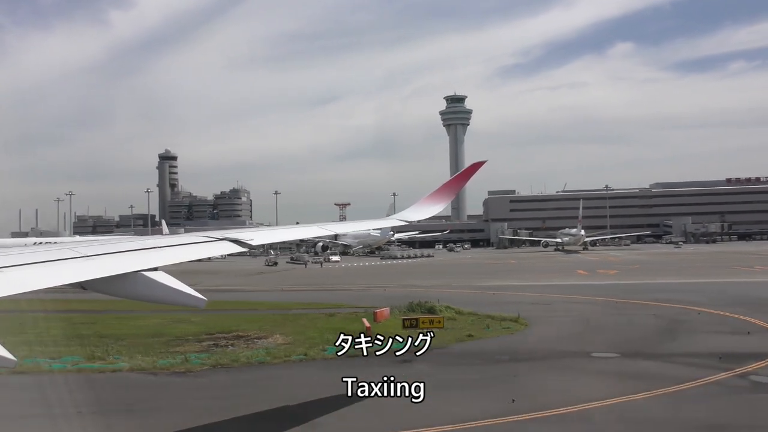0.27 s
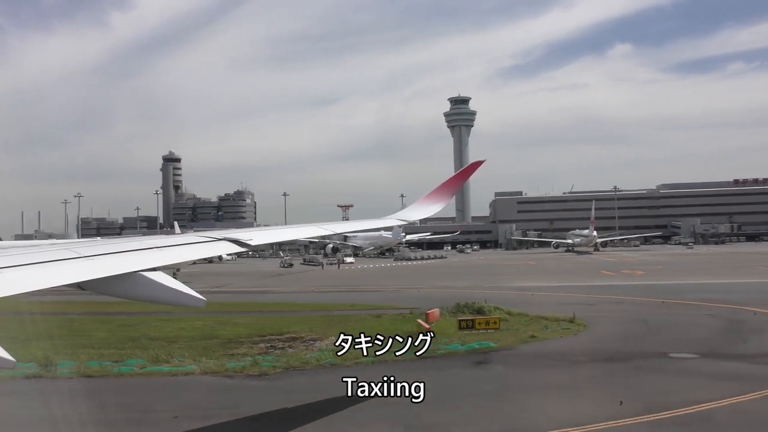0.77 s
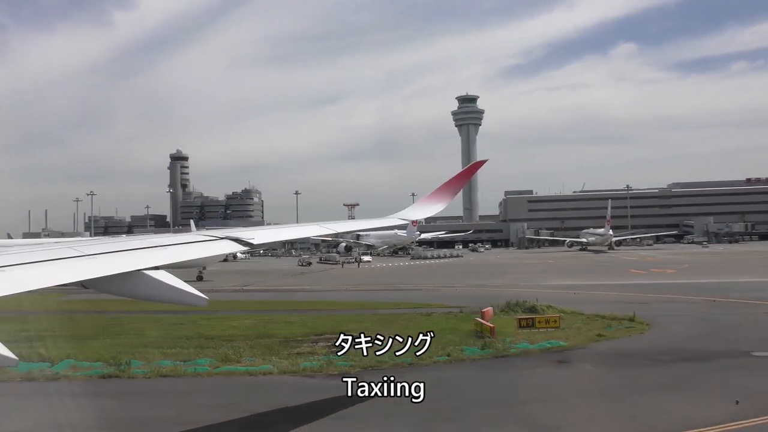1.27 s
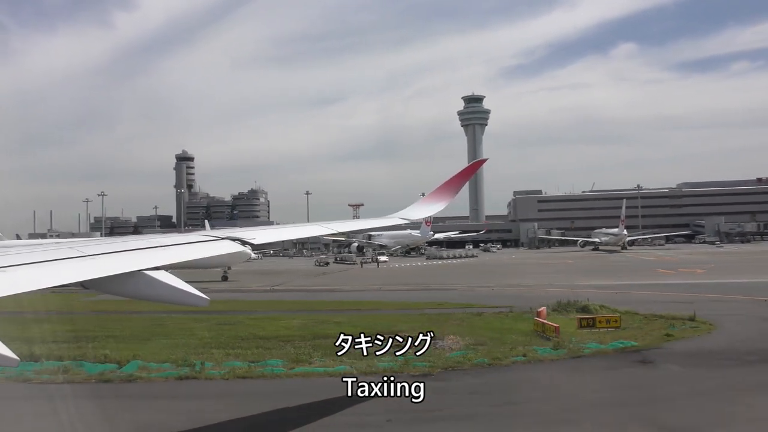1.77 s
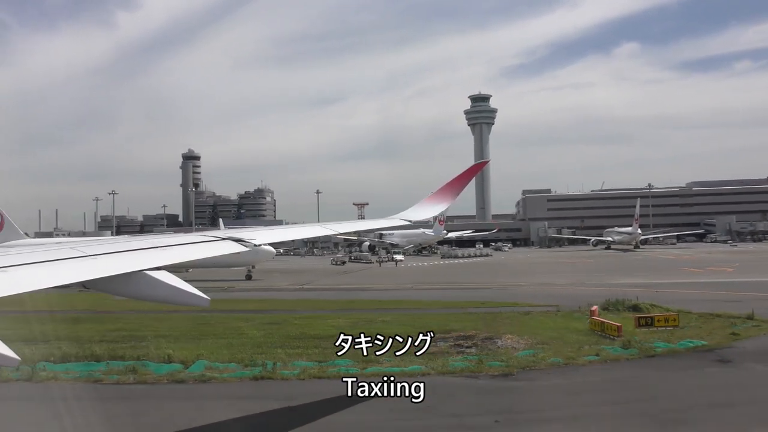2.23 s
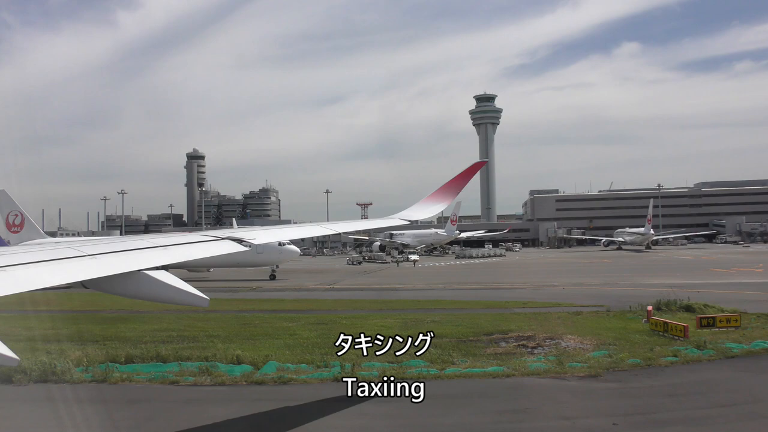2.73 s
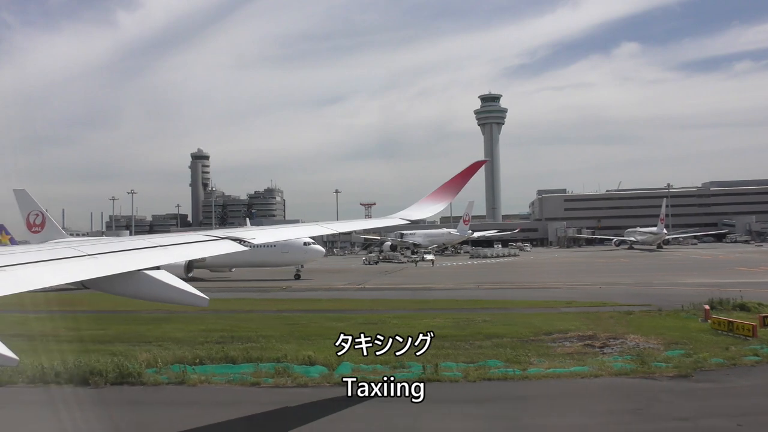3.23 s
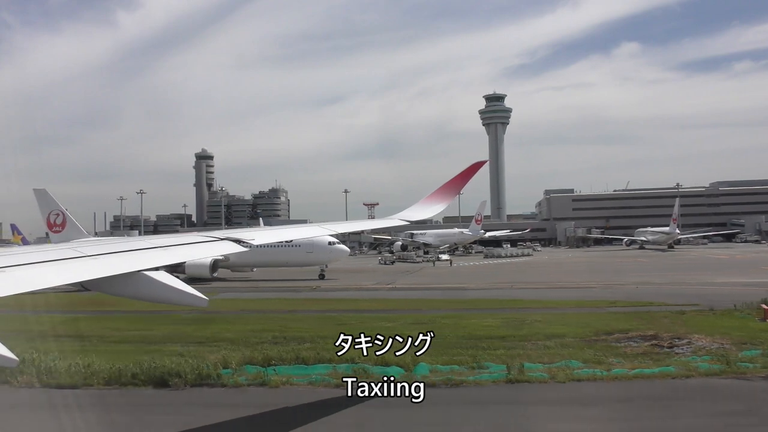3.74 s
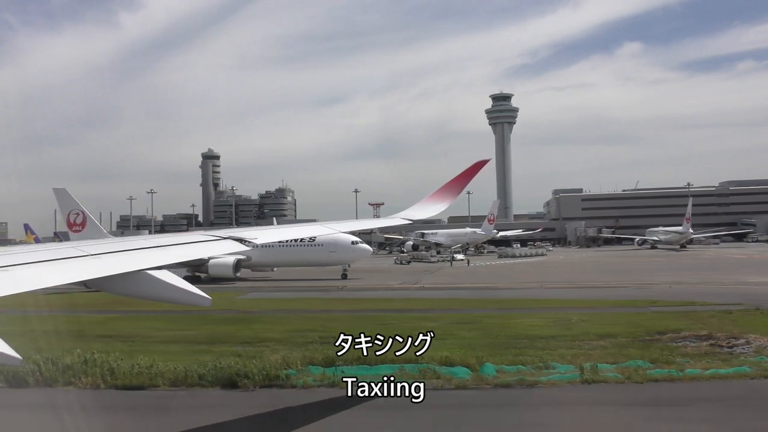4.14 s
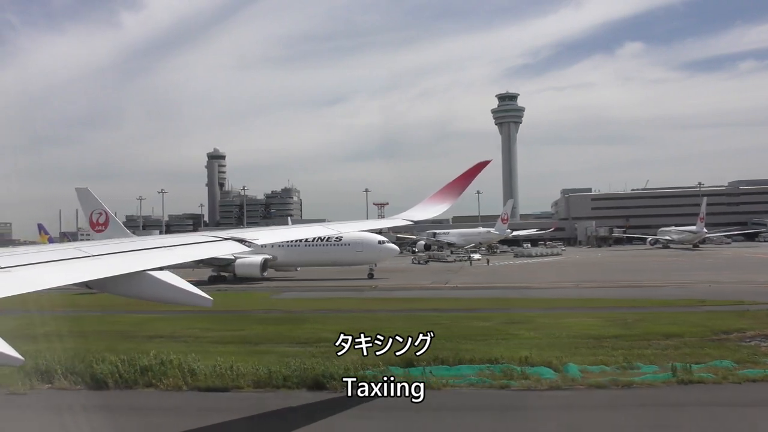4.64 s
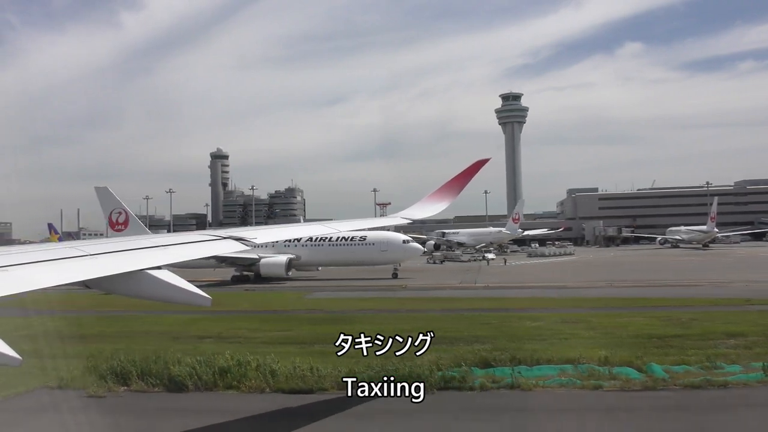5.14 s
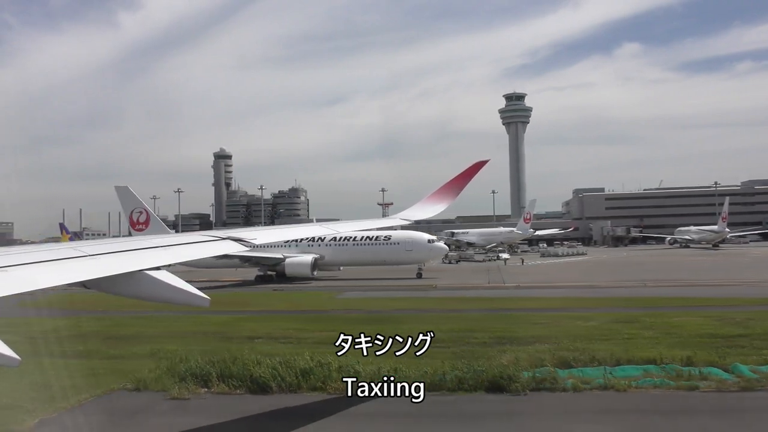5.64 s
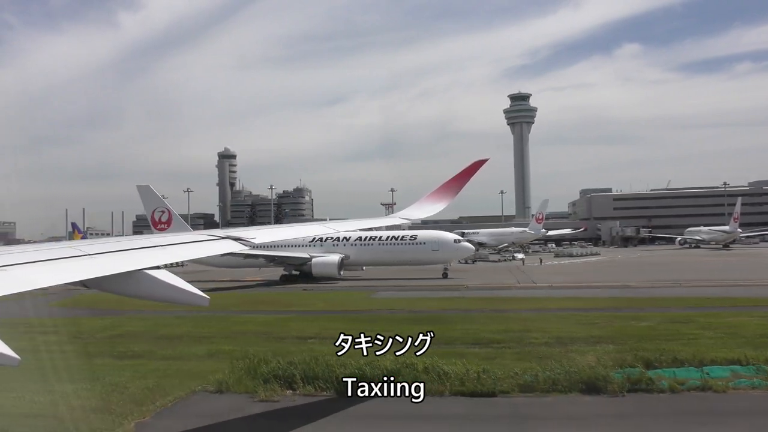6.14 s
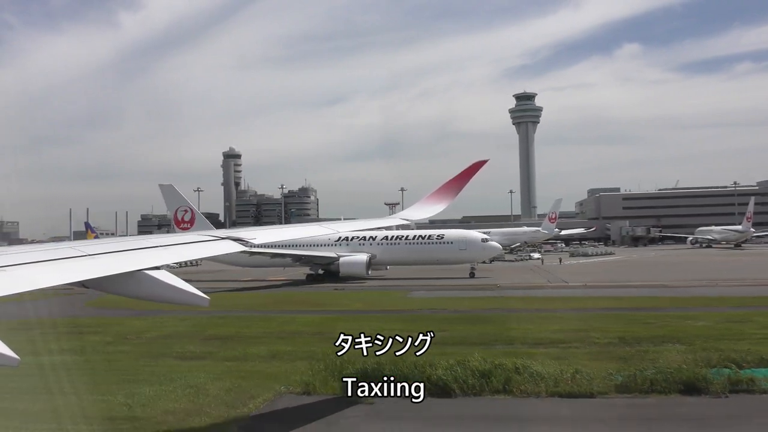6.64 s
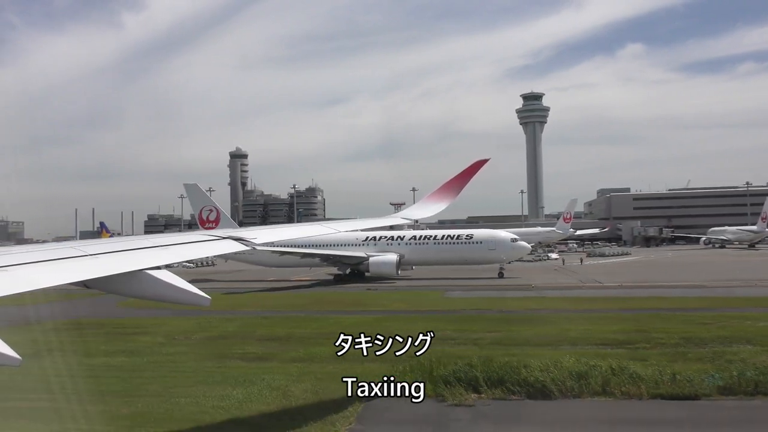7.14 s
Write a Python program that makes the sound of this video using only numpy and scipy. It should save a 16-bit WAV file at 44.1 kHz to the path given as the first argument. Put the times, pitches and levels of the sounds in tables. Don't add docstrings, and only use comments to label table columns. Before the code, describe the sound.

Inside a taxiing jet cabin, deep boomy wheel and engine rumble swells under steady vent hiss, faint pump hum, panel knocks and tiny trim ticks.

```python
import sys
import numpy as np
from scipy import signal
from scipy.fft import rfft, irfft
from scipy.io import wavfile
from scipy.ndimage import uniform_filter1d, minimum_filter1d

SR = 44100
rng = np.random.default_rng(int(sys.argv[2]) if len(sys.argv) > 2 else 0)


def waveform_to_disk(signal):
    frames = np.transpose(np.atleast_2d(signal))
    scaled = np.clip(frames, -1, 1) * 32767
    samples = np.round(scaled).astype(np.int16)
    wavfile.write(sys.argv[1], SR, samples)


def volts_from_db(level):
    exponent = np.asarray(level, float) / 20
    return 10 ** exponent


N = 326340

# pitch_hz, density_db
MIC_HISS = [(2650, -34), (4500, 3), (7020, -3), (11700, -21), (14000, -24), (15500, -34)]
# pitch_hz, left_minus_right_db, left_lead_rad, likeness_0_to_1
PORTS = [(20, 12.5, -1.8, 0.9), (80, 3, -0.62, 1), (178, 1.5, -0.9, 0.98), (235, 0, -1.03, 0.99),
         (310, -2, -1.04, 1), (398, -19, -0.98, 0.8), (447, -4, -0.89, 0), (550, 0, 0.5, 0),
         (616, -5.5, 0.047, 0.57), (900, -4.5, 0.47, 0.33), (1390, -1.5, 0.57, 0.73), (1890, -1, 1, 0.7),
         (3000, 0.1, 0.22, 0.6), (4500, .7, 0.14, 0.58), (6950, 0.5, 0.54, 0.98), (10100, 0.5, -0.22, 0.64),
         (15000, 0.5, 0.21, 0.5)]
# centre_s, share_taken_db, half_s
GAIN_DIPS = [
    (1.236, -4, 0.0043),
    (1.26, -5.5, 0.0059),
]

# pitch_hz, density_db
VENT = [(350, -1.5), (500, 0.5), (700, 1.5), (1050, -7), (1700, -11), (2400, -13), (3400, -17.5),
        (4200, -24.5), (6000, -63.5), (9000, -63.5)]
# pitch_hz, width_hz, level_db
DUCT = [(608.6, 40, 8.5), (890, 40, 3), (1360, 490, 5), (1439, 40, 5.5), (2620, 84, 4.5), (3210, 45, 7)]
# pitch_hz, density_db
NOZZLE = [(2650, -28.5), (4500, -2), (7020, -10), (11600, -7.5), (14300, -10), (15700, -11.5)]

# pitch_hz, density_db
RUSTLE = [(1000, -11.5), (2000, 3.5), (4000, 9.5), (6300, -3.5), (8000, 2), (11500, -6), (13500, -19.5),
          (16000, -30)]
# centre_s, share_taken_db, half_s
LULLS = [(.25, -13, 0.049), (.51, -22.5, 0.029), (1.24, -9.5, .03), (1.33, -13.5, 0.019),
         (1.62, -11.5, 0.027), (2.3, -13, 0.038), (2.68, -12, 0.027), (3.09, -11, 0.018), (3.33, -7, 0.013),
         (3.48, -13, 0.028), (3.72, -23.5, 0.032), (4.1, -11.5, 0.04), (5.32, -18.5, 0.058),
         (5.62, -16, 0.038), (6.7, -19, .06), (6.86, -10, .02)]
# pitch_hz, density_db
CRACKLE = [(1000, -18.5), (2000, 8), (4000, -0.5), (6000, -6), (8500, -6), (11500, -9.5), (14000, -19),
           (16000, -25.5)]
# centre_s, level_db, half_s
SPELLS = [(.01, -59, 0.022), (.55, -63, 0.033), (3.55, -59, 0.022), (1.45, -64, 0.11), (2.2, -57, 0.037),
          (2.47, -56.5, 0.084), (2.7, -60, 0.016), (3.19, -55, 0.055), (3.38, -58.5, 0.037),
          (3.905, -54.5, .022), (4.52, -59.5, 0.055), (4.68, -60.5, 0.056), (4.82, -59, 0.052),
          (3.27, -58.5, .03), (5.09, -58, 0.03), (5.25, -61, 0.052), (5.48, -56.5, 0.033),
          (6.1, -64, 0.026), (6.22, -59, 0.072), (6.48, -55, 0.044), (6.82, -61, 0.028), (6.65, -63, 0.1),
          (7.03, -58, .03), (7.39, -71, .015)]
# pitch_hz, width_hz
SQUEAK = (11650, 800)
# centre_s, level_db, half_s
SQUEAKS = [
    (.53, -77, .03),
    (2.17, -72, 0.068),
    (2.42, -72, .07),
    (4.45, -79, .06),
    (5.27, -77, .07),
    (5.5, -75, .04),
    (6.93, -76, .03),
]

# pitch_hz, density_db
CLOTH = [(500, -8), (1450, 0), (1900, -6.5), (2400, -2), (3300, -6.5), (5000, -11), (8000, -16.5),
         (15500, -26)]
# pitch_hz, width_hz, level_db
HOLLOWS = [(1450, 120, 3), (2260, 270, 5), (7850, 1200, 4)]
# centre_s, level_db, half_s
STROKES = [
    (0.382, -42.5, 0.03),
    (0.985, -42.5, 0.032),
    (0.47, -55, 0.037),
    (0.99, -50.5, 0.036),
    (.34, -56.5, 0.017),
]

# start_s, pitch_hz, peak_db, t60_s
RINGS = [(.545, 10500, -63, .08), (.688, 6800, -62, .08), (1.131, 11100, -56, .06), (1.134, 7000, -58, .14),
         (1.385, 11600, -62, .1), (1.415, 8000, -60, .08), (2.919, 11100, -60, .08),
         (3.13, 5760, -52, 0.093), (3.134, 11500, -62, .08), (3.169, 11600, -56, .08),
         (3.169, 7900, -51, .07), (3.17, 5560, -53, .06), (3.2, 11800, -56, .12), (3.204, 5700, -54, .09),
         (3.206, 8200, -63, .07), (3.345, 10500, -60, .06), (5.21, 7700, -57, 0.13),
         (5.71, 14850, -64, .08), (6.019, 8300, -63, 0.079), (6.1, 9900, -56, .08), (6.23, 9990, -60, .08),
         (6.51, 9300, -55, 0.11), (6.93, 11760, -60, .12), (7.02, 8000, -60, .1), (7.223, 7400, -58, .07)]
# start_s, peak_db, low_band_db, top_band_db
TICKS = [(0.6858, -51.5, -4, -15.5), (0.7906, -49, -8, -20.5), (1.1296, -36, -24, -14.5),
         (1.2094, -56, -1, -11.5), (1.273, -51.5, -8, -15), (1.3783, -47, -14, -10),
         (1.4132, -48, -10, -15.5), (1.9294, -46.5, -8, -16.5), (2.0951, -49, -2, -19),
         (2.4014, -48.5, -7, -11), (2.4375, -53, -9, -10), (2.8285, -50, -1, -8.5),
         (2.9188, -41.5, -17, -14), (2.9831, -47.5, -3, -16), (3.124, -47.5, -5, -20),
         (3.129, -39, -2, -24), (3.1692, -44, -8, -12.5), (3.18, -57, -6, -14.5), (3.2036, -54, -13, -11),
         (3.2734, -49, -7, -11), (3.5389, -47.5, -1, -10.5), (4.4388, -48, -3, -20),
         (4.853, -46.5, -6, -22), (5.011, -44.5, -11, -19), (5.0853, -51, -11, -16),
         (5.7029, -44, -9, -22.5), (5.875, -52, -13, -4), (6.0132, -46, -7, -20.5), (6.23, -42.5, -4, -13),
         (6.512, -47, 2.5, -18), (6.8728, -51, -11, -12.5), (6.9112, -48, -9, -15.5),
         (7.223, -47, -19, -19)]
# pitch_hz, width_hz
SHELL = [(7700, 4500), (4600, 2700), (12300, 5000)]
# start_s, peak_db, upper_band_db
KNOCKS = [(0.474, -32, -11), (0.6005, -33, -22), (1.5473, -39, -18), (1.9763, -37, -2), (2.4364, -35, -13),
          (2.546, -27.5, -6), (2.556, -39, -2), (3.126, -28.5, -5), (3.1804, -30, -1), (3.135, -36, 3.5),
          (3.298, -32.5, -7.5), (3.702, -31, -11), (3.827, -32, -21), (3.933, -29.5, -24),
          (4.323, -34.5, -16), (4.4623, -32.5, -20), (4.5476, -34, -6), (4.7795, -32, -16),
          (4.861, -36, -2), (4.88, -33, -6), (3.2, -41, -10), (3.27, -40, 1.5), (0.55, -41, -9),
          (6.92, -35, -5), (5.165, -34, -19), (5.546, -31, -12), (5.825, -39, -16), (6.7625, -45, -17),
          (6.807, -31.5, -6), (6.818, -38, -15), (6.935, -38, -14), (6.8912, -42, 1), (7.3003, -35, -16)]
# pitch_hz, width_hz
PANEL = [(1520, 740), (2400, 1400)]
# pitch_hz, width_hz
FLOOR_PANEL = (610, 560)
# centre_s, level_db, half_s
BUMPS = [
    (.55, -50, .02),
    (2.58, -46, .015),
    (3.13, -43, .012),
    (3.62, -45, 0.016),
    (4.87, -38, 0.016),
    (5.03, -41, 0.0093),
    (6.6, -46, .02),
    (6.828, -40.5, 0.0089),
]

# pitch_hz, level_db, octave_db
PUMPS = [(434.7, -43.5, -71), (435.48, -50, -73)]
# pitch_hz, level_db
SHAFTS = [(30.49, -51), (36.04, -46), (79.95, -41), (119.95, -42), (128.82, -38.5), (159.98, -30.5),
          (188.33, -37.5), (204.99, -42)]

# time_s, thud_db
ROLL = [(0.0, -26), (0.22, -56), (0.33, -40), (0.45, -35), (0.52, -41.5), (0.84, -49), (1.94, -27.5),
        (2.74, -39), (2.8, -25), (2.84, -36.5), (5.03, -35), (5.05, -33), (5.25, -50.5), (5.54, -34.5),
        (5.69, -37), (7.4, -39.5)]
# pitch_hz, density_db
THUD = [(15, -4), (25, 4), (38, 19.5), (48, 14), (58, 9), (75, 13.5), (110, -45.5), (300, -110)]
# pitch_hz, density_db
HULL = [(50, -41), (70, -17), (110, -11.5), (150, -6), (240, -7.5), (270, -11), (330, -19), (420, -24),
        (500, -30.5), (800, -63), (2500, -120)]
# pitch_hz, width_hz, level_over_hull_db
CABIN_MODES = [(83.8, 43, 6.5), (126.2, 19.4, 3.5), (165.8, 26.3, 6), (186.8, 18.6, 5), (219.7, 26.4, 7),
               (297.5, 22.3, 5), (397, 68, 3)]
# pitch_hz, density_db
HEAVE = [(15, -9), (28, 5), (45, 5.5), (80, -5.5), (120, -32), (300, -110)]
# centre_s, level_db, half_s
SEAMS = [
    (.1, -38, .08),
    (.33, -30, .05),
    (.54, -28, 0.055),
    (.7, -29, 0.08),
    (1.06, -30, 0.044),
    (1.62, -33, 0.04),
    (2.1, -26.5, 0.042),
    (3.15, -43.5, 0.033),
    (5.28, -39.5, 0.034),
]
# centre_s, level_db, half_s
BOUNCE = [
    (.34, -25, .06),
]


def track(table):
    s, *columns = np.transpose(table)
    return [np.interp(np.arange(N) / SR, s, column) for column in columns]


def over_hz(table):
    hz, *columns = np.transpose(table)
    bins = np.log(np.arange(N // 2 + 1) * SR / N + 1)
    return [np.interp(bins, np.log(hz), column) for column in columns]


def unit(x):
    return x / np.sqrt(np.mean(x ** 2))


def noise(slope, modes=()):
    hz = np.arange(N // 2 + 1) * SR / N
    db = over_hz(slope)[0]
    for mode_hz, width_hz, top_db in modes:
        db = db + top_db / (1 + (2 * (hz - mode_hz) / width_hz) ** 2)
    return unit(irfft(rfft(rng.standard_normal((2, N))) * volts_from_db(db), N))


def band(hz, width_hz):
    edges = [hz - width_hz / 2, hz + width_hz / 2]
    resonance = signal.butter(2, edges, "bandpass", fs=SR, output="sos")
    return unit(signal.sosfilt(resonance, rng.standard_normal((2, N))))


def even(x):
    return x / np.sqrt(uniform_filter1d(x ** 2, size=200) + 0.05)


def walk(rate_hz):
    hold = int(SR / rate_hz)
    held = np.repeat(rng.standard_normal(N // hold + 1), hold)
    return unit(uniform_filter1d(uniform_filter1d(held, hold), hold)[:N])


def bells(table):
    t = np.arange(N) / SR
    return sum(volts_from_db(db) * np.exp(-0.5 * ((t - s) / half_s) ** 2) for s, db, half_s in table)


def bursts(s, db, t60_s, rise_s):
    out, t = np.zeros(N + SR), np.arange(SR // 4) / SR
    shape = (1 - np.exp(-t / rise_s)) * np.exp(-np.log(1000) * t / t60_s)
    for start, gain in zip(s, volts_from_db(db)):
        i = int(start * SR)
        out[i:i + len(t)] += gain * shape
    return out[:N]


def lull():
    return np.clip(1 - bells(LULLS), 0.05, 1)


def microphone_hiss():
    return volts_from_db(-69 + 1.7 * walk(8) + 0.8 * walk(30)) * lull() * noise(MIC_HISS)


def vents():
    ducts = volts_from_db(-43 + 0.2 * walk(9) + 0.58 * walk(25)) * noise(VENT, DUCT)
    nozzles = volts_from_db(-65 + 0.72 * walk(6.8) + 1.0 * walk(35)) * lull() * noise(NOZZLE)
    return ducts + nozzles


def loose_trim():
    when, size = rng.random((500, 2)).T
    grain_db = -4.5 * np.log(0.04 + size)
    grains = unit(bursts(when * N / SR, grain_db, t60_s=0.036, rise_s=0.0008))
    level = volts_from_db(-65.5 + 1.1 * walk(9.4)) * (0.4 + 0.48 * grains)
    rustle = level * lull() * noise(RUSTLE)
    spells = bells(SPELLS) * volts_from_db(2.4 * walk(60)) * noise(CRACKLE)
    return rustle + spells + bells(SQUEAKS) * band(*SQUEAK)


def cloth_strokes():
    return noise(CLOTH, HOLLOWS) * bells(STROKES)


def rings():
    out, t = np.zeros((2, N + SR)), np.arange(SR // 5) / SR
    spread, rise_s = 0.033, 0.0018
    chance = rng.standard_normal((len(RINGS), 2, 4, 2))
    for (s, hz, db, t60_s), c in zip(RINGS, chance):
        partial_hz = hz * (1 + spread * c[..., :1] / 2)
        tones = np.sin(2 * np.pi * partial_hz * t + 10 * c[..., 1:]).sum(axis=1) / 2
        envelope = (1 - np.exp(-t / rise_s)) * np.exp(-np.log(1000) * t / t60_s)
        i = int(s * SR)
        out[:, i:i + len(t)] += volts_from_db(db) * envelope * tones
    return out[:, :N]


def ticks():
    s, db, low_db, top_db = np.transpose(TICKS)
    out = 0
    for mode, relative_db in zip(SHELL, (0, low_db + 6.5, top_db + 11.0)):
        out = out + bursts(s, db + relative_db - 9.0, t60_s=0.06, rise_s=0.0018) * band(*mode)
    return out


def panel_knocks():
    s, db, upper_db = np.transpose(KNOCKS)
    out = bells(BUMPS) * even(band(*FLOOR_PANEL))
    for mode, relative_db in zip(PANEL, (0, upper_db - 0.7)):
        out = out + bursts(s, db + relative_db - 4.0, t60_s=0.036, rise_s=0.0014) * even(band(*mode))
    return out


def pumps_and_shafts():
    t, out = np.arange(N) / SR, 0
    cancel_s, drift_rad = 0.02, 0.15
    for k, (hz, db, octave_db) in enumerate(PUMPS):
        phase = 2 * np.pi * hz * (t - cancel_s) + np.pi * k + drift_rad * walk(0.5)
        out = out + volts_from_db(db) * np.sin(phase) + volts_from_db(octave_db) * np.sin(2 * phase)
    for hz, db in SHAFTS:
        phase = 2 * np.pi * (hz * t + rng.random()) + drift_rad * walk(0.6)
        out = out + volts_from_db(db + walk(0.7)) * np.sin(phase)
    return np.sqrt(2) * out * np.array([[1], [0]])


def rumble():
    roll_db = track(ROLL)[0]
    thud = volts_from_db(roll_db - 0.5) * noise(THUD)
    boom_db = -20.5 + 0.12 * (roll_db - roll_db.mean()) + 0.5 * walk(4.9)
    boom = volts_from_db(boom_db) * noise(HULL, CABIN_MODES)
    heave = bells(SEAMS) * noise(HEAVE)
    bounce_hz = 44
    bounce = bells(BOUNCE) * np.sin(2 * np.pi * bounce_hz * np.arange(N) / SR)
    return thud + boom + heave + bounce * np.array([[1], [0]])


def at_ports(field):
    common, other = rfft(field)
    tilt_db, lead_rad, like = over_hz(PORTS)
    like = np.clip(like, 0, 1)
    same = np.sqrt((1 + like) / 2) * common
    apart = np.sqrt((1 - like) / 2) * other
    turn = volts_from_db(tilt_db / 2) * np.exp(0.5j * lead_rad)
    sum_power = abs(turn + 1 / turn) ** 2 * (1 + like) / 2
    sum_power = sum_power + abs(turn - 1 / turn) ** 2 * (1 - like) / 2
    ports = np.array([(same + apart) * turn, (same - apart) / turn])
    return irfft(2 / np.sqrt(sum_power) * ports, N)


def scene():
    background = microphone_hiss() + vents() + loose_trim() + cloth_strokes()
    hits = rings() + ticks() + panel_knocks()
    return at_ports(background + hits + pumps_and_shafts() + rumble())


def roll_off(x):
    return signal.sosfilt(signal.butter(12, 15760, fs=SR, output="sos"), x)


def record(dry):
    peak = -minimum_filter1d(-np.abs(dry).max(axis=0), size=500)
    gain = np.minimum(1, (volts_from_db(-11.5) / peak) ** 0.8) * (1 - bells(GAIN_DIPS))
    mix = dry * uniform_filter1d(gain, size=500)
    return roll_off(mix)


dry = scene()
out = record(dry)
waveform_to_disk(out)
```